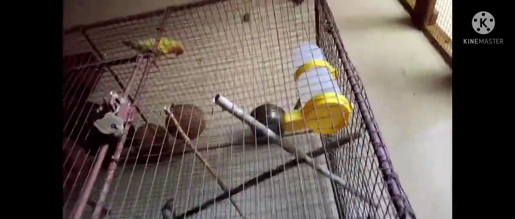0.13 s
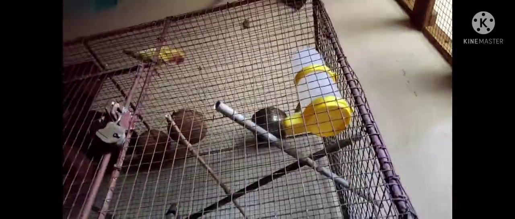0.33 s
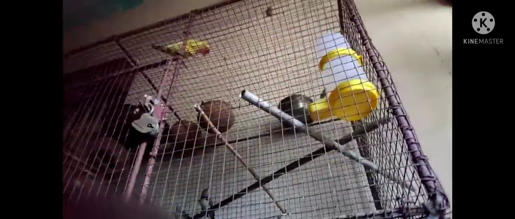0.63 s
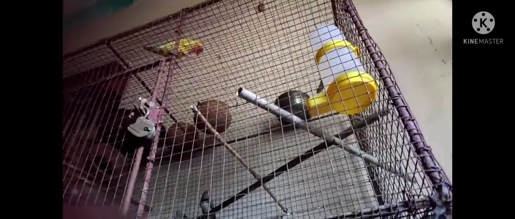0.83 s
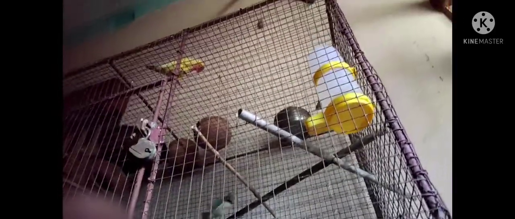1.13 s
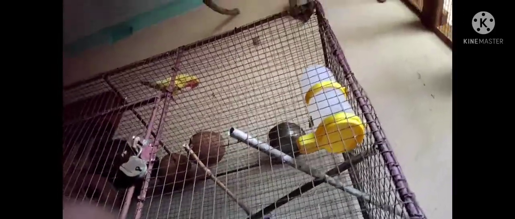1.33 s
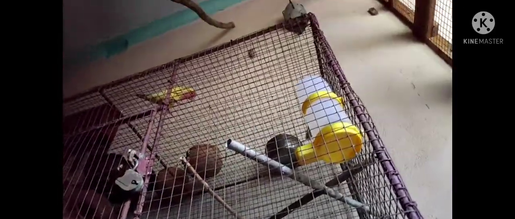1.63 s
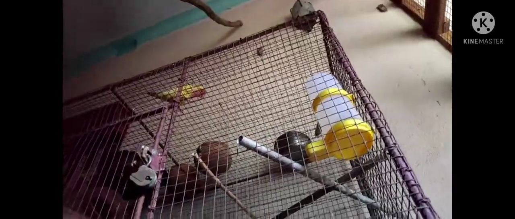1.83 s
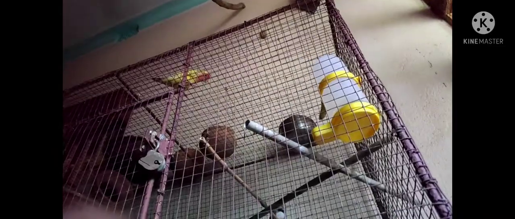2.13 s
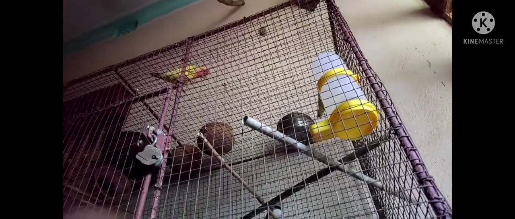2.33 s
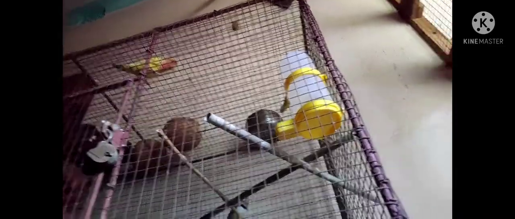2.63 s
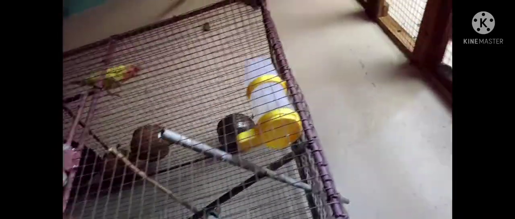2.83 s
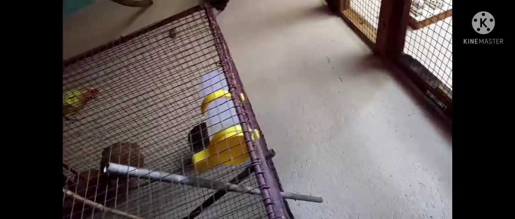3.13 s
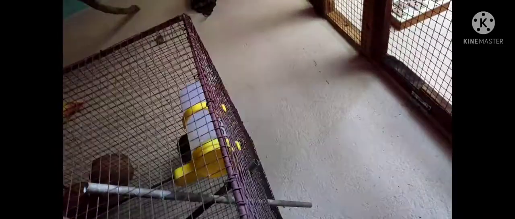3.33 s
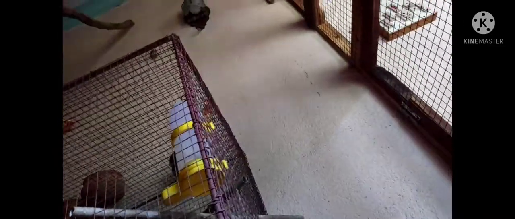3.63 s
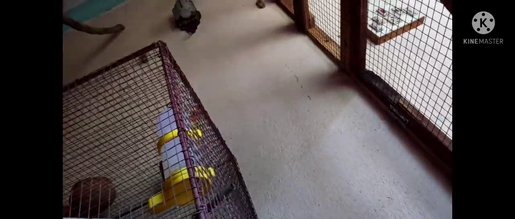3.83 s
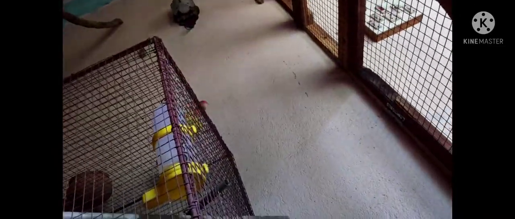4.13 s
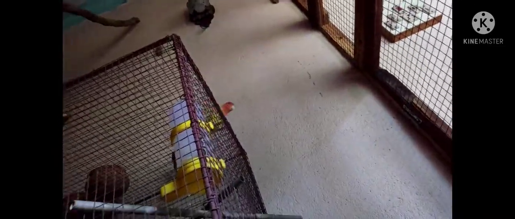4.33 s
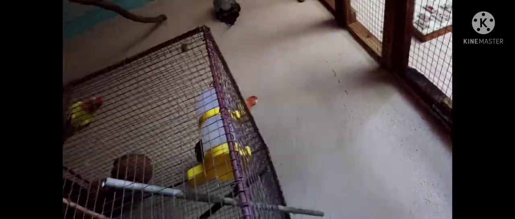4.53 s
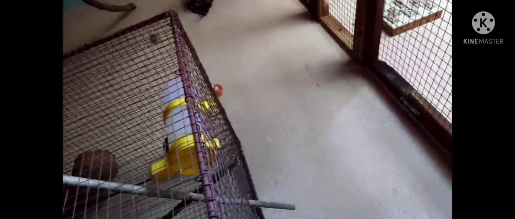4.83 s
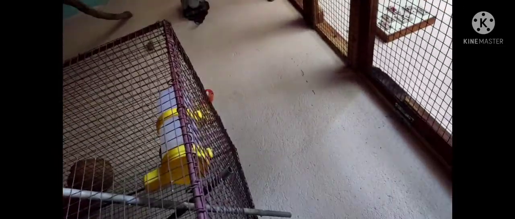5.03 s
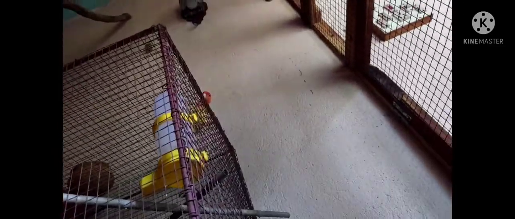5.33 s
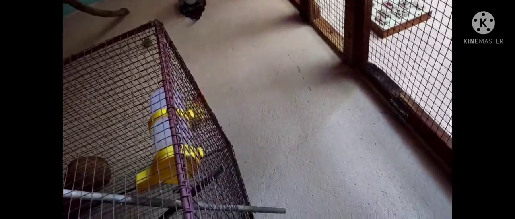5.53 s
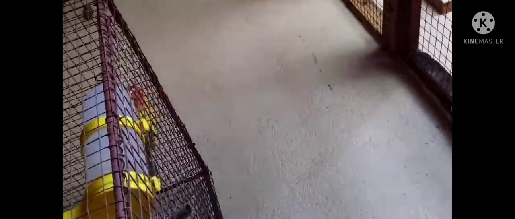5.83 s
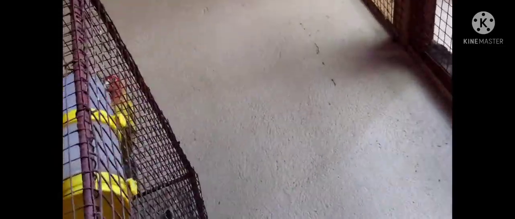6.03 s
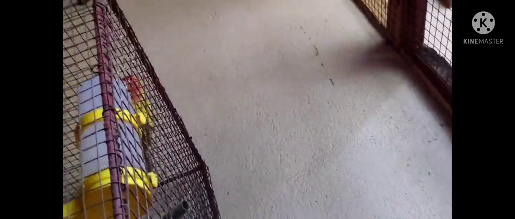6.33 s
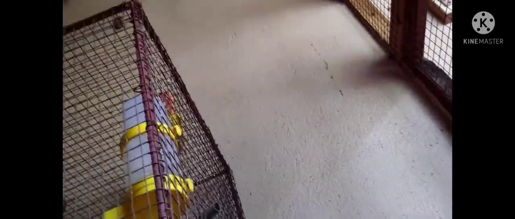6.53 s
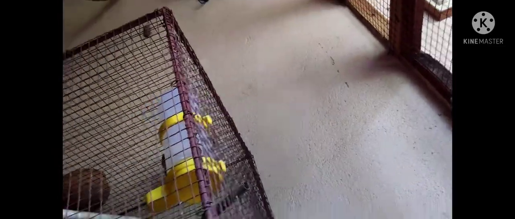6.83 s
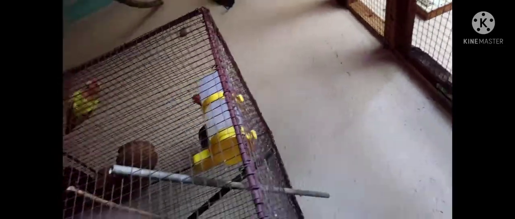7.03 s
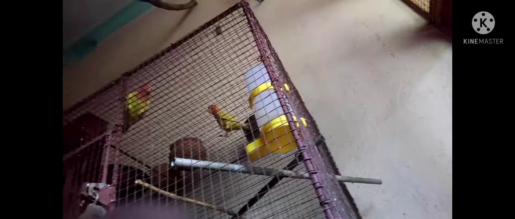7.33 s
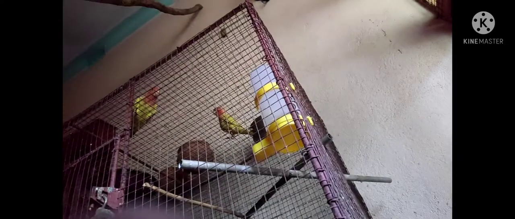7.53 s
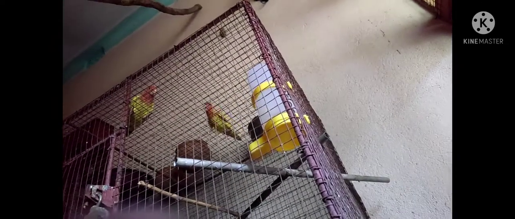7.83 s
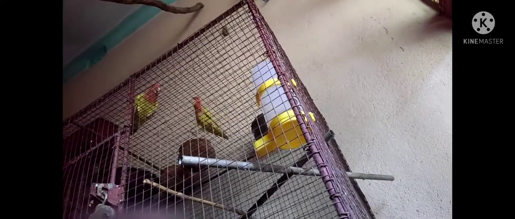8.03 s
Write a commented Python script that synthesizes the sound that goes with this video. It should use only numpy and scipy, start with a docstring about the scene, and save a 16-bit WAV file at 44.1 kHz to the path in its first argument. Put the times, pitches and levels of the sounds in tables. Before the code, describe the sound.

Close, shrill parrot calls around three to seven kilohertz, very short and slightly hoarse, burst out in clusters and leave echoes of about half a second. Between them are faint air, a weak hum, small nasal murmurs, a distant whistle and cage wire ticking. Two stretches of wing flutter pass. The hand-held two-channel microphone picks up low thumps and rumble, stronger on the left; the calls shift from side to side.

```python
"""Small parrots call in a wire cage: shrill gliding whistles with cracked undertones, coloured by the beak, and
soft buzzy murmurs summed from pulse harmonics. A faint low-mid swell, wing flutter, wire rattles and hand bumps
are shaped noise, the bumps with a low thump. A far whistle, faint hum, grip rumble and air lie behind. Bare
walls ring by sparse echoes; a hand-held two-port microphone hears it all through gain control and a limiter."""
import sys
import numpy as np
from scipy import signal
from scipy.fft import rfft, irfft
from scipy.io import wavfile
from scipy.ndimage import uniform_filter1d, minimum_filter1d

SR = 44100
rng = np.random.default_rng(int(sys.argv[2]) if len(sys.argv) > 2 else 0)


def natural_amplitude(level_db):
    """Convert a level in decibels to a linear amplitude factor, elementwise."""
    exponent = np.asarray(level_db, float) / 20
    return 10 ** exponent


def store_wav(level_fs):
    """Save 16-bit WAV to argv[1]."""
    pcm = np.round(np.clip(np.atleast_2d(level_fs), -1, 1) * 32767)
    wavfile.write(sys.argv[1], SR, pcm.T.astype(np.int16))


N = 360297
LEAD = SR // 10  # samples of early start, so that the room already rings


def evened(x):
    """Scales to rms 1."""
    return x / np.sqrt(np.mean(x ** 2) + 1e-20)


def read(points, hz):
    """Reads a table on a log-frequency axis."""
    f, value = np.transpose(points)
    return np.interp(np.log(hz + 1), np.log(f + 1), value)


def coloured(x, points):
    """Filters by a (Hz, dB) table."""
    size = x.shape[-1]
    gain = natural_amplitude(read(points, np.fft.rfftfreq(size, 1 / SR)))
    return irfft(rfft(x) * gain, size)


# Left-right likeness of diffuse sound. Each row: frequency in Hz, likeness from 0 to 1.
LIKENESS = [(60, .8), (290, .92), (620, .74), (1360, .1), (3000, 0)]


def paired(x):
    """Makes the two channels alike in the bass, as in two close ports."""
    size = x.shape[-1]
    z = rfft(x)
    same = np.clip(read(LIKENESS, np.fft.rfftfreq(size, 1 / SR)), 0, 1)
    right = same * z[0] + np.sqrt(1 - same ** 2) * z[1]
    return irfft(np.array([z[0], right]), size)


def add(mix, start_s, sound):
    """Lays a sound into the mix at a time in seconds."""
    part = mix[..., LEAD + round(start_s * SR):][..., :sound.shape[-1]]
    part += sound[..., :part.shape[-1]]


def curves(rows):
    """Returns the start time and the other columns sample by sample."""
    s, *columns = np.transpose(rows)
    t = np.arange(s[0], s[-1], 1 / SR)
    return s[0], [np.interp(t, s, c) for c in columns]


def drift(size, span):
    """Smooth random wander of rms 1, smoothed over span samples."""
    return evened(uniform_filter1d(uniform_filter1d(rng.standard_normal(size), span), span))


# Room decay. Each row: frequency in Hz, t60 in seconds.
ROOM_T60 = [(300, 0.54), (1000, 0.63), (2500, 0.61), (5000, 0.59), (8000, 0.59), (13000, 0.35)]


def room(x):
    """Sparse echoes of random sign from bare walls, each band dying at its own speed."""
    taps = np.zeros((2, SR))
    at = np.arange(200, SR - 20, 20) + rng.integers(0, 20, (2, (SR - 201) // 20))
    np.put_along_axis(taps, at, rng.choice([-1., 1.], at.shape), 1)
    hz, t, z = signal.stft(taps, SR, nperseg=256)
    early = 1 + .4 * np.exp(-t / 0.015)  # near walls answer first and louder
    decay = natural_amplitude(-60 * t / read(ROOM_T60, hz)[:, None])
    tail = paired(signal.istft(z * early * decay, SR, nperseg=256)[1])
    tail = tail / np.linalg.norm(tail, axis=1, keepdims=True)
    return signal.fftconvolve(x[None], tail, axes=1)[:, :len(x)]


# Air colour. Each row: frequency in Hz, relative density in dB per Hz.
AIR_COLOUR = [(59, -44.5), (100, 3.5), (786, -5.5), (1050, -8), (1920, -8), (2570, -14.5), (3110, -11),
              (14500, -28.5)]
AIR_RMS_DB = -59


def room_air(size):
    """Broadband noise of the air, alike in both ports in the bass."""
    noise = rng.standard_normal((2, size))
    return natural_amplitude(AIR_RMS_DB) * evened(paired(coloured(noise, AIR_COLOUR)))


# Hum lines. Each row: centre frequency in Hz, level in dB before the swell.
HUM_LINES = [(689, -82)]
# Swell of the hum. Each row: time in seconds, gain in dB.
HUM_SWELL_DB = [(0, 20.5), (4.3, -18), (4.6, 25.5), (5.2, 17.5), (5.5, 15)]


def hum(size):
    """A sine wavering in pitch and level under a slow swell."""
    t = (np.arange(size) - LEAD) / SR
    out = np.zeros(size)
    for hz, db in HUM_LINES:
        level = natural_amplitude(db + 1.0 * drift(size, 3000))
        phase = 2 * np.pi * np.cumsum(hz + 4.0 * drift(size, 1500)) / SR
        out += level * np.sin(phase)
    return out * natural_amplitude(np.interp(t, *np.transpose(HUM_SWELL_DB)))


# Grip noise in the case. Each row: time in seconds, level in dB before wander and side balance.
GRIP_LEVEL = [(0, -64), (.3, -47.5), (.8, -54), (1.6, -55.5), (2.5, -56), (3.3, -56), (3.6, -52), (4, -50),
              (4.2, -57), (5.3, -54.5), (6.7, -55.5), (7.1, -46), (7.88, -43), (7.97, -59), (8.17, -61)]


def grip_rumble(size):
    """Lumpy low noise of the gripping hand, stronger on the left."""
    t = (np.arange(size) - LEAD) / SR
    colour = [(8, -9.0), (25, 11.0), (45, 0.0), (70, 6.0), (130, -29.5), (300, -46.0), (600, -80.5)]
    low = evened(paired(coloured(rng.standard_normal((2, size)), colour)))
    level_db = np.interp(t, *np.transpose(GRIP_LEVEL)) + 0.43 * drift(size, 1200)
    return low * natural_amplitude(level_db) * natural_amplitude(np.array([[3.5], [-3.5]]))


# A far bird's whistle. Each row: time in seconds, relative level in dB, frequency in Hz.
FAR_WHISTLE = [(4.93, -71.5, 2420), (5.024, -62.5, 2430), (5.45, -79, 2650)]


def far_call():
    """Distance smears the whistle into a narrow band of noise."""
    s, (db, hz) = curves(FAR_WHISTLE)
    size = len(hz)
    turn = np.exp(2j * np.pi * np.cumsum(hz) / SR)
    fuzz = [(turn * (drift(size, 40) + 1j * drift(size, 40))).real for _ in range(2)]
    return s, natural_amplitude(db + 8.0) * evened(np.array(fuzz)) * signal.windows.tukey(size, .3)


# The hand bumps the case. Each row: start in seconds, relative thump level in dB, relative tick level in dB.
HAND_BUMPS = [(0.168, -33.5, -38), (0.214, -60, -47), (0.222, -41, -44), (0.249, -65, -58),
              (0.361, -46, -77), (1.319, -42, -51), (1.364, -37.5, -49), (1.448, -33.5, -50.5),
              (1.488, -44, -59), (1.874, -34.5, -42), (1.99, -44, -85), (4.529, -32.5, -56),
              (5.469, -41, -68), (6.414, -44, -52.5), (6.485, -38, -59)]
THUMP_HZ, THUMP_SIDE_DB = 54, 12  # left raised, right lowered


def bump(thump_db, tick_db, noise):
    """The case flexes once, low, with a dull tick on contact."""
    t = np.arange(len(noise)) / SR
    push = np.sin(2 * np.pi * THUMP_HZ * t) * np.exp(-t / 0.0021) * 3
    sides = natural_amplitude(np.array([[THUMP_SIDE_DB], [-THUMP_SIDE_DB]]))
    colour = [(200, 10.5), (2000, 10.0), (6000, 1.5), (14000, -29.0)]
    tick = evened(coloured(noise, colour)) * np.exp(-t / 0.012)
    return -natural_amplitude(thump_db) * push * sides + natural_amplitude(tick_db + 5) * tick


# Claws and wings rattle the cage. Each row: start in seconds, relative level in dB, tilt in dB per octave.
CAGE_RATTLES = [(0.024, -35, 18.5), (0.14, -47, -4.5), (1.012, -34, 1), (1.874, -55, -1.5),
                (2.85, -26.5, 4), (2.874, -34, 3), (3.316, -43, -0.5), (3.368, -41, -1.5),
                (3.998, -39, 4.5), (5.258, -56, -5), (6.104, -54.5, 1), (6.748, -46.5, 2.5),
                (7.849, -34.5, 5)]
# Wire colour. Each row: frequency in Hz, relative density in dB per Hz.
WIRE_COLOUR = [(120, -66.5), (200, -7.5), (854, 0.5), (1850, -7.5), (2090, 1.5), (4860, -6), (6360, -4),
               (14500, -28.5)]
RATTLE_RISE_S, RATTLE_FADE_S = 0.00036, 0.04  # time constants


def rattle(db, bright_db, noise):
    """A short shiver of wire: quick rise, fast fade."""
    t = np.arange(len(noise)) / SR
    tilt = [(hz, g + bright_db * np.log2(hz / 1000)) for hz, g in WIRE_COLOUR]
    shape = (1 - np.exp(-t / RATTLE_RISE_S)) * np.exp(-t / RATTLE_FADE_S)
    return natural_amplitude(db) * evened(coloured(noise, tilt)) * shape


# A faint low-mid swell, then two spells of wing flutter; one list a spell. Each row: time in seconds, relative
# level in dB.
BEATING_SPELLS = [
    [(0.35, -67.5), (0.58, -53.5), (0.82, -72)],
    [(3.3, -57), (3.37, -70), (3.56, -45.5), (3.66, -43), (3.98, -44.5), (4.05, -49.5), (4.3, -46),
     (4.5, -60.5)],
    [(6.74, -63), (6.81, -43.5), (6.95, -42), (7.06, -41.5), (7.17, -43), (7.35, -42.5), (7.65, -44.5),
     (7.88, -46), (7.98, -105)],
]
# Colour of the beating noise. Each row: frequency in Hz, relative density in dB per Hz.
BEATING_COLOUR = [(59, -50), (100, -6), (161, -6.5), (220, -9.5), (480, -2.5), (700, -7.5), (1100, -13.5),
                  (1530, -13.5), (2090, -16.5), (7290, -20), (14500, -40)]
BEATS_PER_S, UPSTROKE_SHARE = 16, 0.4


def beating_noise(rows):
    """Noise in beats: a strong puff on each downstroke and a weaker one on the upstroke."""
    s, (db,) = curves(rows)
    size = len(db)
    turns = np.cumsum(2 * BEATS_PER_S * (1 + 0.073 * drift(size, 3000))) / SR
    stroke = np.where(turns.astype(int) % 2, UPSTROKE_SHARE, 1) * natural_amplitude(2.5 * drift(size, 900))
    puffs = 0.033 + stroke * np.sin(np.pi * turns) ** 4
    return s, natural_amplitude(db) * evened(coloured(rng.standard_normal(size) * puffs, BEATING_COLOUR))


# Soft murmurs. Each row: start in seconds, length in seconds, relative level in dB,
# pulse rate in Hz before scoop and sag, swell to the end in dB.
SOFT_MURMURS = [(0.396, 0.06, -63.5, 565, 15), (0.592, 0.084, -50.5, 577, -6), (2.11, 0.13, -60, 594, 2.5),
                (2.293, 0.13, -53.5, 577, 3.5), (5.523, 0.18, -51.5, 596.5, 3.5),
                (6.346, 0.097, -50, 593, 1.5)]
# Throat resonances. Each row: centre in Hz, width in Hz, relative gain in dB.
THROAT_PEAKS = [(1180, 1500, -15.5), (3700, 2200, 6.5), (5300, 1100, -1.5), (6600, 1500, -6.5),
                (9500, 2500, -30.5)]
SCOOP_SHARE, SCOOP_S = 0.063, 0.052  # slide up to pitch
SAG_SHARE, GRAIN = .06, .55  # pitch lost at the end, air in the voice


def murmur(length_s, db, pulse_hz, swell_db):
    """Quick pulses and some air through a half-shut throat."""
    t = np.arange(0, length_s, 1 / SR)
    size = len(t)
    hz = pulse_hz * (1 - SCOOP_SHARE * np.exp(-(t / SCOOP_S) ** 2) - SAG_SHARE * (t / length_s) ** 4)
    phase = 2 * np.pi * np.cumsum(hz * (1 + 0.0019 * drift(size, 60))) / SR
    out = np.zeros(size)
    for k in range(2, 22):
        throat = sum(natural_amplitude(g) / (1 + (2 * (k * hz - f) / w) ** 2) for f, w, g in THROAT_PEAKS)
        unsteady = natural_amplitude(5.0 * drift(size, 400)) + GRAIN * drift(size, 30)
        out += throat * unsteady * np.cos(k * phase + k * k / 3)
    return natural_amplitude(db + swell_db * t / length_s) * evened(out) * signal.windows.tukey(size, .6)


def chirp_bend(hz):
    """Shoots up and settles close to the top pitch."""
    start_share, settle_share = .79, 0.3  # of the top pitch, of the length
    return lambda u: hz * (1 - (1 - start_share) * np.exp(-u / settle_share))


def glide(hz, rise):
    """A straight slide by a share of the pitch."""
    return lambda u: hz * (1 + rise * u)


def ease(hz, rise):
    """A slide that levels off as it arrives."""
    return lambda u: hz * (1 + rise * np.sin(np.pi / 2 * u))


# The voice breaks in the upper registers. Each row: note in Hz, undertone gain in dB before strain.
VOICE_CRACK = [(3500, -28), (4000, -36), (4450, -23), (4800, -8.5), (5200, -8), (5600, -15), (6100, -31.5),
               (6700, -13.5)]
OCTAVE_DB, TWELFTH_DB, RASP_DB = -12.5, -13, -22  # overtones and breath against the fundamental
ATTACK_MS, ATTACK_SHARE, RELEASE_MS = 0.49, 0.06, 2.76  # longer notes start softer
FLUTTER_RMS_DB = 3.2


def note(ms, db, strain_db, bend, wander, flutter, breath):
    """A bent whistle; folds closing every other cycle add half-step lines, air adds rasp."""
    size = round(ms * SR / 1000)
    u = np.linspace(0, 1, size)
    hz = bend(u)
    phase = 2 * np.pi * np.cumsum(hz * (1 + wander[:size])) / SR
    whole = np.sin(phase) + natural_amplitude(OCTAVE_DB) * np.sin(2 * phase) + natural_amplitude(TWELFTH_DB) * np.sin(3 * phase)
    halves = 0.32 * np.sin(phase / 2) + np.sin(3 * phase / 2) + 1.3 * np.sin(5 * phase / 2)
    undertone = natural_amplitude(read(VOICE_CRACK, hz) + strain_db) * halves
    attack = u * ms / (ATTACK_MS + ATTACK_SHARE * ms)
    release = (1 - u) * ms / RELEASE_MS
    shape = np.sin(np.pi / 2 * np.minimum(np.minimum(attack, release), 1)) ** 2
    voice = whole + undertone + natural_amplitude(RASP_DB) * breath[:size]
    return natural_amplitude(db) * voice * shape * natural_amplitude(FLUTTER_RMS_DB * flutter[:size])


# Screeches that open a burst of chatter. Each row: start in seconds, relative level in dB.
OPENING_SCREECHES = [(2.353, -16.5), (3.998, -11), (7.922, -11)]
SCREECH_MS, SCREECH_HZ, SCREECH_RISE, SCREECH_STRAIN_DB = 21, 4350, 0.56, 0
# Upward flicks. Each row: start in seconds, length in ms, top pitch in Hz, relative level in dB.
UP_FLICKS = [(-0.075, 34, 4880, -14), (0.033, 4.9, 5800, -9), (0.482, 9.6, 4525, -21),
             (0.49, 8.7, 5300, -24), (0.839, 9.4, 4350, -17.5), (1.757, 11.6, 4257, -24),
             (2.369, 22.2, 5090, -14), (2.523, 19, 4620, -13), (2.64, 5.4, 4416, -11.5),
             (2.715, 20.4, 5023, -10.5), (3.541, 8.7, 4400, -17), (3.673, 7.9, 4240, -30.5),
             (3.699, 12, 5074, -32), (4.008, 12, 4920, -9), (6.806, 11.8, 4640, -12),
             (6.812, 10, 5470, -17), (7.682, 9.9, 4763, -14), (8.012, 6.8, 6600, -9),
             (8.09, 10.4, 6460, -12)]
# Falling answers. Each row: start in seconds, length in ms, start pitch in Hz, relative level in dB.
FALLING_NOTES = [(0.502, 4.1, 5140, -12), (0.524, 13.7, 4280, -28.5), (0.862, 6, 3460, -32.5),
                 (1.768, 7, 3370, -40), (0.855, 10, 4550, -18.5), (2.594, 7, 6450, -18.5),
                 (8.018, 7, 6850, -16.5), (3.555, 9.6, 4030, -32), (3.723, 14, 4623, -22.5),
                 (6.82, 9, 4260, -20.5), (6.983, 15, 4620, -20.5), (7.698, 8, 4740, -13.5),
                 (7.712, 9.2, 4666, -19.5)]
DROP_FALL = 0.22  # share of pitch lost
# Rising sweeps. Each row: start in seconds, length in ms, start pitch in Hz, relative level in dB.
RISING_SWEEPS = [(2.582, 16, 5547, -17), (3.821, 13, 3876, -28), (3.995, 12.6, 3700, -16),
                 (4.058, 6.2, 5516, -11), (4.148, 15, 4105, -9.5), (5.659, 17, 4490, -24),
                 (5.727, 22, 5350, -7), (6.84, 19, 4175, -18.5), (6.9, 15, 5430, -7.5),
                 (7.155, 11, 4055, -16)]
SWEEP_RISE, SWEEP_RISE_PER_MS = 0.09, 0.007  # share of pitch gained: longer sweeps climb further
# Held notes, low and high register. Each row: start in seconds, length in ms, mid pitch in Hz,
# relative level in dB.
HELD_NOTES = [(-0.04, 23, 5760, -18.5), (0.038, 10.8, 5537, -10.5), (0.497, 5.5, 5255, -17.5),
              (0.503, 11, 4093, -20), (0.514, 11.5, 3940, -31), (0.849, 6, 4280, -24),
              (2.441, 9.1, 6834, -14), (2.458, 60, 6530, -24), (2.661, 22, 3224, -28),
              (2.362, 8.4, 3210, -25.5), (2.727, 23, 3190, -27.5), (2.404, 7, 3970, -20),
              (2.426, 9.3, 4350, -13.5), (2.44, 13, 4350, -19), (2.458, 8.7, 4018, -8),
              (2.467, 4.2, 4300, -10.5), (2.476, 25, 3170, -27.5), (2.498, 25, 3964, -14),
              (2.601, 8.1, 5340, -13.5), (2.62, 9.5, 6350, -15.5), (2.65, 7.6, 3856, -19.5),
              (2.644, 20, 6600, -14), (2.677, 9.1, 4116, -11.5), (2.688, 21, 3760, -9),
              (3.832, 33, 4680, -15), (3.852, 8.7, 5460, -9.5), (3.872, 3.9, 4170, -10.5),
              (4.019, 12, 5056, -13), (4.056, 3.3, 3970, -1), (4.072, 21.5, 4113, -14.5),
              (4.09, 9.2, 6470, -9.5), (4.104, 22, 3940, -12), (4.132, 9.2, 3060, -18.5),
              (4.156, 30, 3947, -11.5), (4.163, 14, 4793, -15.5), (5.666, 24, 4480, -12),
              (5.698, 35, 5112, -11.5), (6.856, 32, 4980, -13), (6.829, 24, 6300, -18.5),
              (6.883, 26.2, 6212, -7), (7.113, 23.6, 4078, -14.5), (7.14, 25, 4200, -20.5),
              (7.942, 15, 4066, -16.5), (7.948, 35, 4689, -14.5), (7.984, 16, 5095, -27.5),
              (7.998, 16.4, 4170, -11), (8.031, 21, 3855, -14), (8.044, 29, 5786, -17),
              (8.078, 14.4, 3850, -10), (8.104, 14.8, 5226, -21), (8.136, 7.8, 4090, -15.5),
              (8.145, 27, 6530, -21.5)]
HELD_RISE = 0.013  # share of pitch gained
# Strain of the calling bird, each value held to the next. Each row: time in seconds, undertone gain in dB.
CALL_STRAIN = [(0, -23), (0.47, -10), (2.35, 1), (2.5, -14), (2.57, 5.5), (2.7, -16), (3.5, 9), (3.8, -29),
               (3.98, -0.5), (4.13, -8), (5.65, 3.5), (5.695, -5), (6.8, 1.5), (6.828, 0), (7.11, 1.5),
               (7.9, 3), (8.08, 10.5)]
# Breath colour. Each row: frequency in Hz, relative density in dB per Hz.
RASP_COLOUR = [(1500, -43), (3500, -17), (5000, 4.5), (8000, -8), (13500, -24), (15000, -39)]
# Colour of the open beak. Each row: frequency in Hz, gain in dB.
BEAK_COLOUR = [(1100, -45.5), (1900, -10.5), (2400, 4), (3250, 0.5), (3480, -6.5), (3750, -4.5), (9000, -6),
               (11000, -13.5), (13300, -15)]
WOBBLE_SHARE, WARBLE_SHARE = .011, .007  # rms of quick jitter and slower warble, as shares of pitch


def calls(size):
    """All screeches, chirps, drops, sweeps and held notes, through the open beak."""
    out = np.zeros(size)
    since, effort_db = np.transpose(CALL_STRAIN)
    screech = glide(SCREECH_HZ, SCREECH_RISE)
    notes = [(s, SCREECH_MS, db, SCREECH_STRAIN_DB, screech) for s, db in OPENING_SCREECHES]
    notes += [(s, ms, db, 0, chirp_bend(hz)) for s, ms, hz, db in UP_FLICKS]
    notes += [(s, ms, db, 0, ease(hz, -DROP_FALL)) for s, ms, hz, db in FALLING_NOTES]
    notes += [(s, ms, db, 0, ease(hz, SWEEP_RISE + SWEEP_RISE_PER_MS * ms))
              for s, ms, hz, db in RISING_SWEEPS]
    notes += [(s, ms, db, 0, glide(hz / (1 + HELD_RISE / 2), HELD_RISE)) for s, ms, hz, db in HELD_NOTES]
    breath = evened(coloured(rng.standard_normal((len(notes), 4096)), RASP_COLOUR))
    jitter, warble, unsteady = rng.standard_normal((3, len(notes), 4096))
    wobble = evened(uniform_filter1d(jitter, size=45))
    warble = evened(uniform_filter1d(uniform_filter1d(warble, size=150), size=150))
    wander = WOBBLE_SHARE * wobble + WARBLE_SHARE * warble
    flutter = evened(uniform_filter1d(uniform_filter1d(unsteady, size=50), size=50))
    for (s, ms, db, extra_db, bend), w, f, b in zip(notes, wander, flutter, breath):
        strain_db = extra_db + effort_db[max(np.searchsorted(since, s) - 1, 0)]
        add(out, s, note(ms, db, strain_db, bend, w, f, b))
    return natural_amplitude(1.0) * coloured(out, BEAK_COLOUR)


# Place of the direct sound, each value held to the next. Each row: time in seconds,
# left minus right in dB, delay of the left port in samples.
PERCHES = [(0, 10.5, 46.5), (0.481, -11.5, -11), (1.7, -17, -3.5), (2.35, -3, 30), (3.54, -1, 9),
           (5.65, -0.5, 11), (6.8, 6, -7), (7.11, -7, 19.5), (7.9, 3, -13)]


def placed(direct):
    """Level and arrival time differ between the ports as the perch changes."""
    size = len(direct)
    s, pan_db, lag = np.transpose(PERCHES)
    place = np.maximum(np.searchsorted(s, (np.arange(size) - LEAD) / SR) - 1, 0)
    side_db = pan_db[place] / 2
    late = np.clip(np.arange(size) - lag[place].astype(int), 0, size - 1)
    return np.array([direct[late] * natural_amplitude(side_db), direct * natural_amplitude(-side_db)])


def scene():
    """Birds and cage sound in the room; hand and background reach the microphone directly."""
    size = N + LEAD
    near = room_air(size) + hum(size) + grip_rumble(size)
    add(near, *far_call())
    for row, noise in zip(HAND_BUMPS, rng.standard_normal((len(HAND_BUMPS), 4096))):
        add(near, row[0], bump(*row[1:], noise))
    cage, beating = np.zeros((2, size))
    for row, noise in zip(CAGE_RATTLES, rng.standard_normal((len(CAGE_RATTLES), 8192))):
        add(cage, row[0], rattle(*row[1:], noise))
    for rows in BEATING_SPELLS:
        add(beating, *beating_noise(rows))
    voices = calls(size)
    for row in SOFT_MURMURS:
        add(voices, row[0], murmur(*row[1:]))
    direct = natural_amplitude(5) * voices + natural_amplitude(-3.0) * beating + natural_amplitude(1.5) * cage
    echoing = natural_amplitude(5.5) * voices + natural_amplitude(1.5) * beating + natural_amplitude(5.5) * cage
    return (placed(direct) + room(echoing) + near)[:, LEAD:]


def top_cut(x):
    """Nothing passes above the cut-off."""
    return signal.sosfilt(signal.butter(12, 14810, fs=SR, output="sos"), x)


# Port colour. Each row: frequency in Hz, left minus right in dB.
PORT_COLOUR = [(500, 1), (2500, 2), (5000, 0), (8000, -5), (11000, -3), (13500, 3)]
KNEE_DB, SQUEEZE_DB_PER_DB, RECOVERY_DB_PER_S = -11, 1, 38  # gain control
LIMITER_CEILING, EDGE_HZ = .76, 14500


def record(dry):
    """Ports colour the sound; gain control ducks everything under loud calls; limiter and band limit follow."""
    left = coloured(dry[0], [(f, g / 2) for f, g in PORT_COLOUR])
    right = coloured(dry[1], [(f, -g / 2) for f, g in PORT_COLOUR])
    ports = np.array([left, right])
    power = signal.lfilter([.004], [1, -.996], (ports ** 2).mean(0))
    power_db = 10 * np.log10(power + 1e-12)
    fall_db = np.arange(N) * RECOVERY_DB_PER_S / SR
    held_db = np.maximum.accumulate(power_db + fall_db) - fall_db  # instant rise, steady fall
    over_db = np.maximum(held_db - KNEE_DB, 0)
    ducked = ports * natural_amplitude(-SQUEEZE_DB_PER_DB * uniform_filter1d(over_db, size=200))
    headroom = np.minimum(LIMITER_CEILING / (abs(ducked).max(0) + 1e-9), 1)
    limited = ducked * uniform_filter1d(minimum_filter1d(headroom, size=301), size=201)
    lowpass = signal.firwin(511, EDGE_HZ, window=("kaiser", 8), fs=SR)
    return top_cut(signal.oaconvolve(limited, lowpass[None], "same"))


dry = scene()
out = record(dry)
store_wav(out)
```